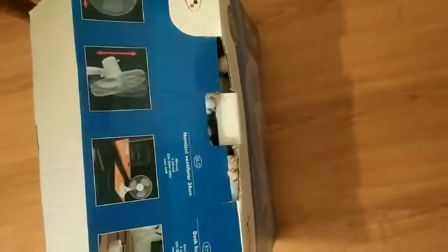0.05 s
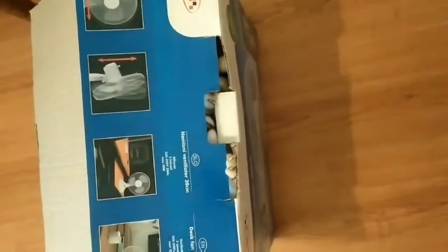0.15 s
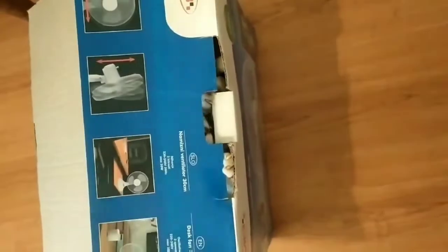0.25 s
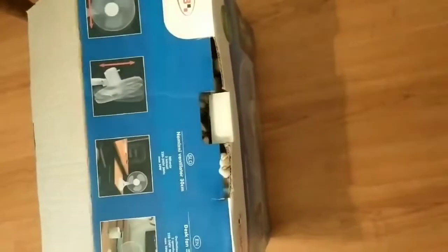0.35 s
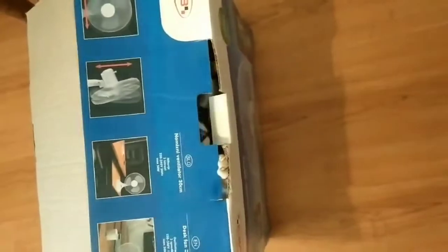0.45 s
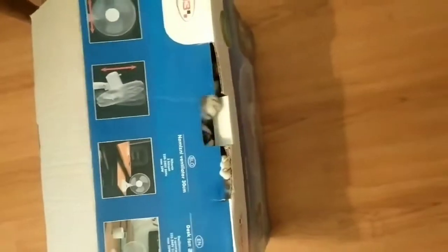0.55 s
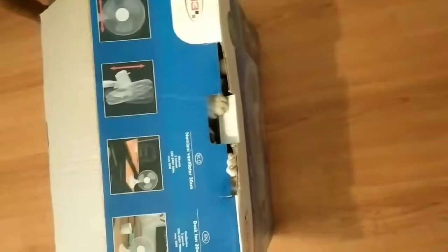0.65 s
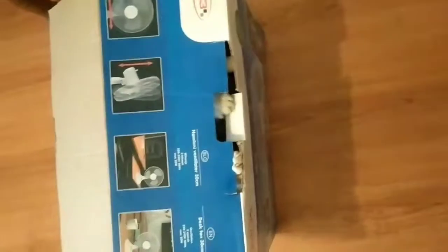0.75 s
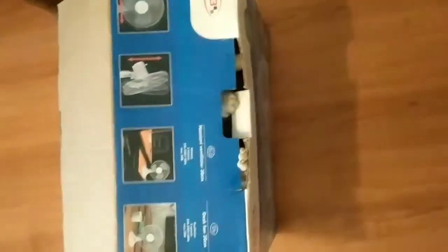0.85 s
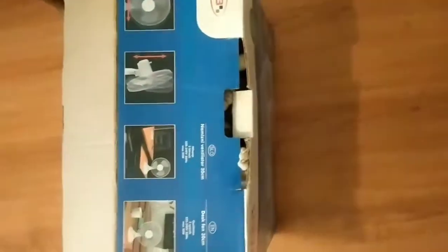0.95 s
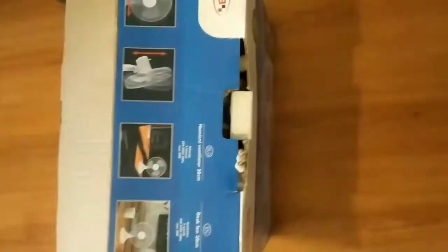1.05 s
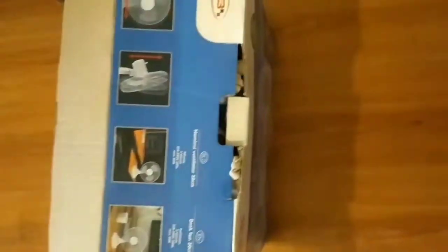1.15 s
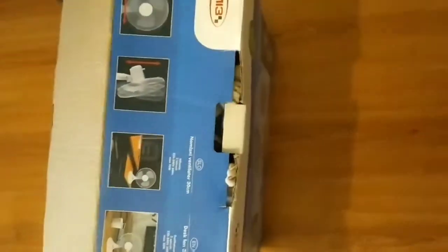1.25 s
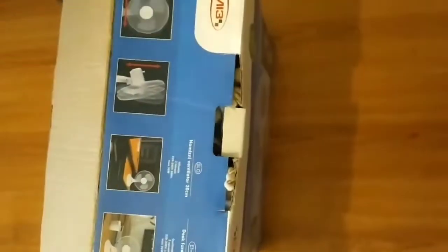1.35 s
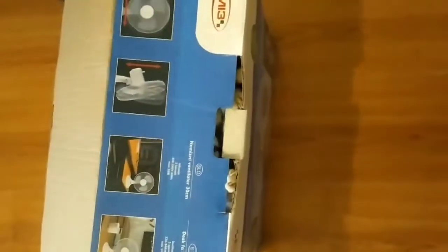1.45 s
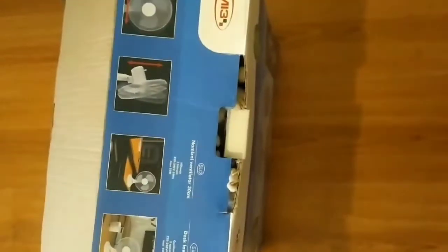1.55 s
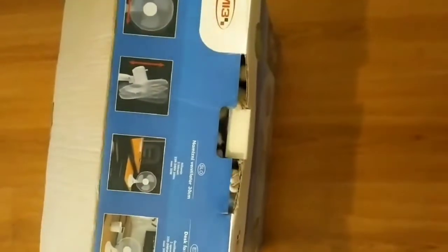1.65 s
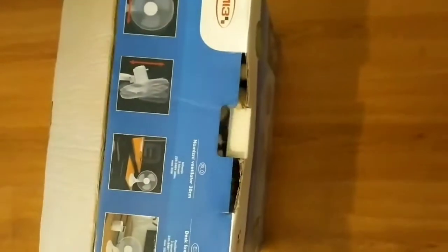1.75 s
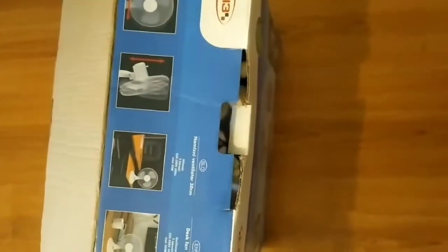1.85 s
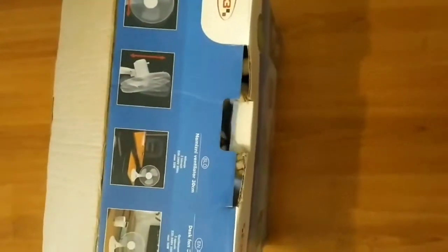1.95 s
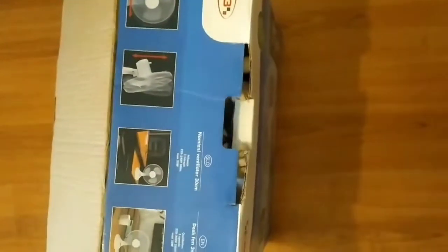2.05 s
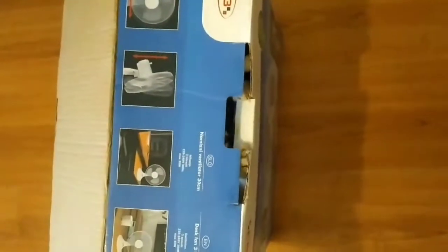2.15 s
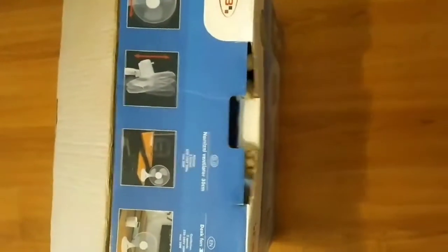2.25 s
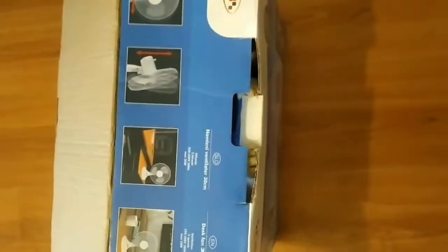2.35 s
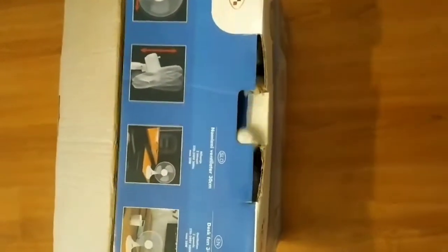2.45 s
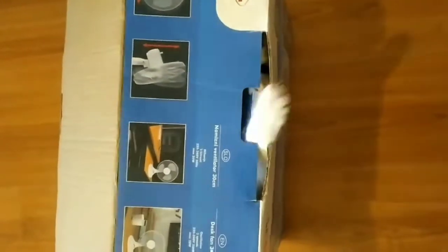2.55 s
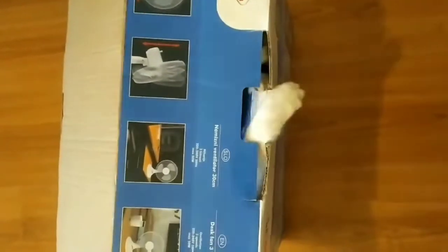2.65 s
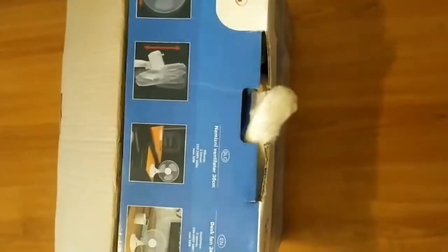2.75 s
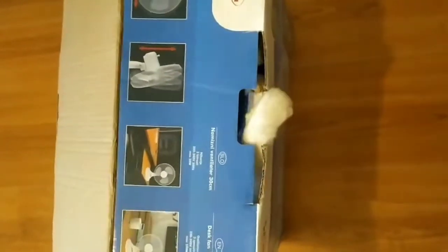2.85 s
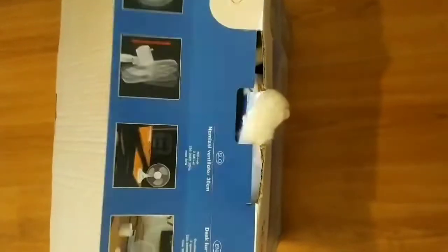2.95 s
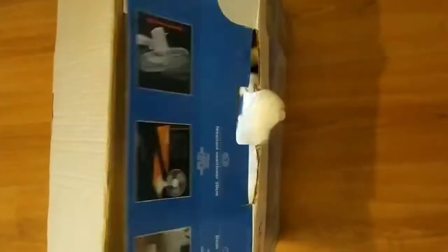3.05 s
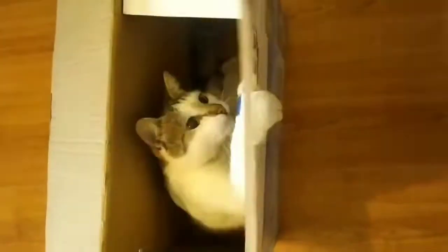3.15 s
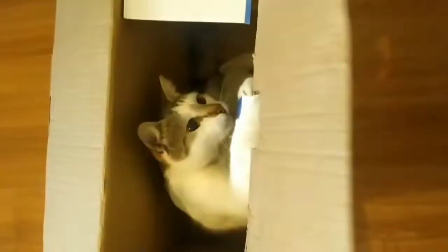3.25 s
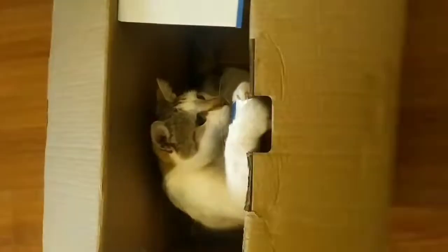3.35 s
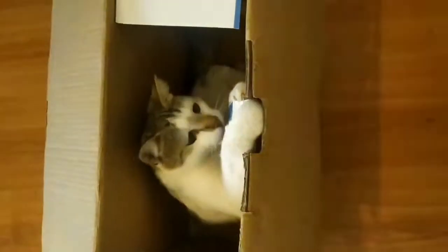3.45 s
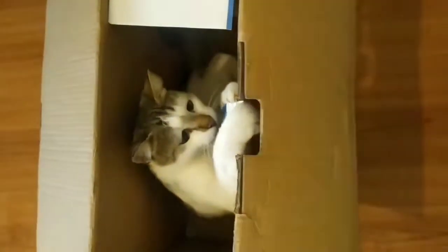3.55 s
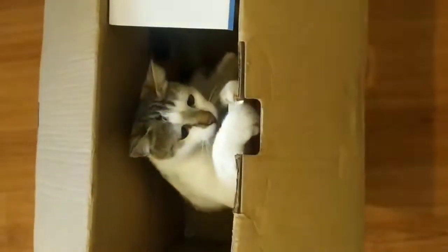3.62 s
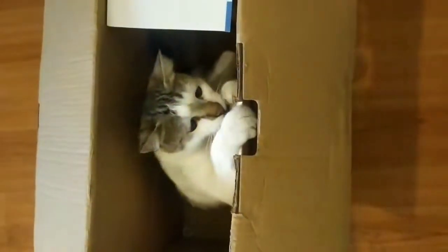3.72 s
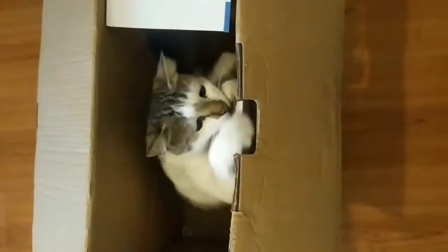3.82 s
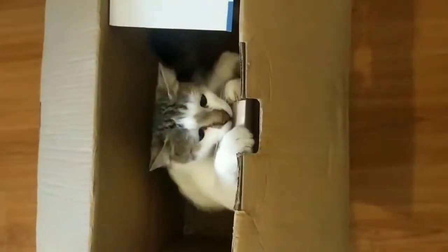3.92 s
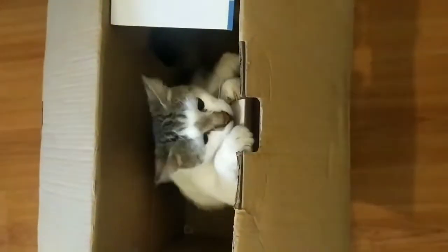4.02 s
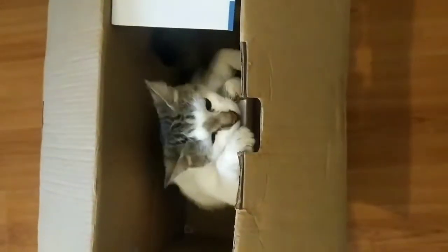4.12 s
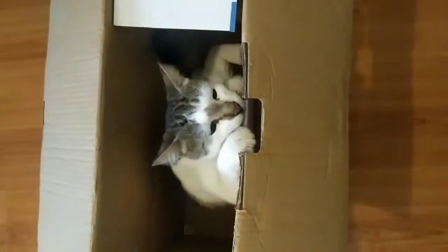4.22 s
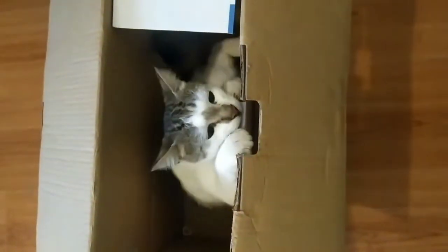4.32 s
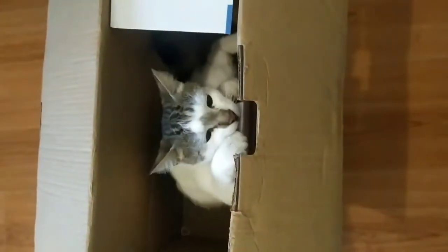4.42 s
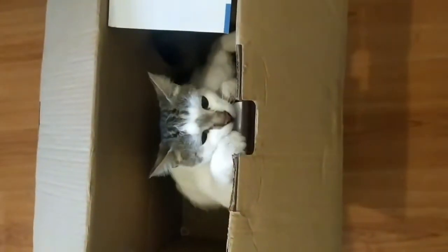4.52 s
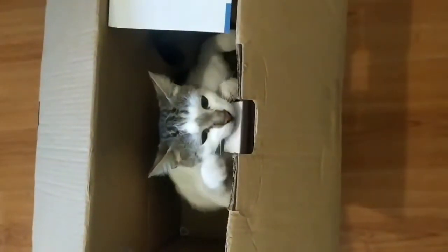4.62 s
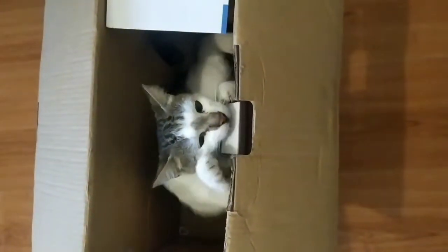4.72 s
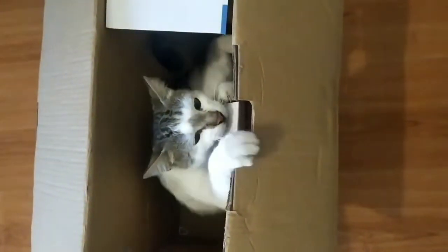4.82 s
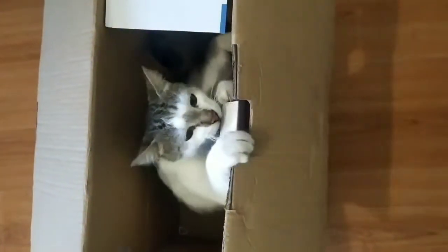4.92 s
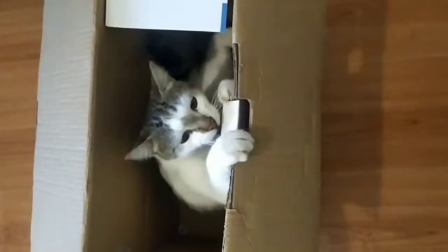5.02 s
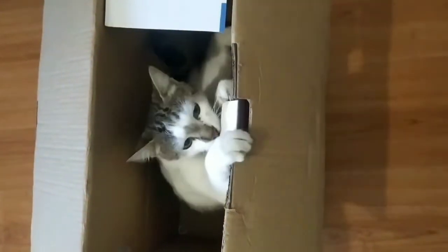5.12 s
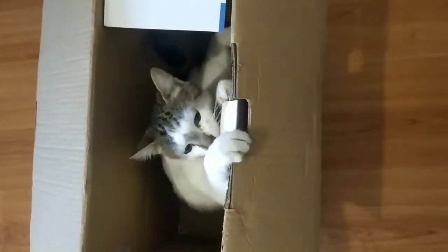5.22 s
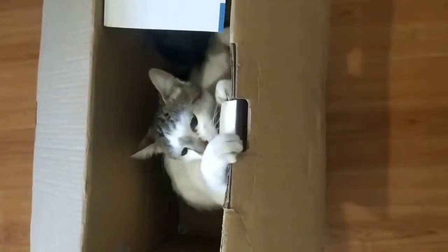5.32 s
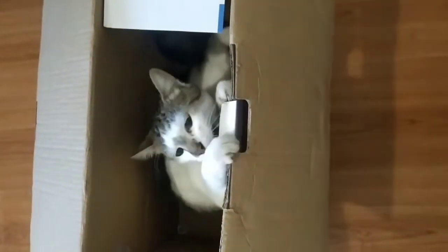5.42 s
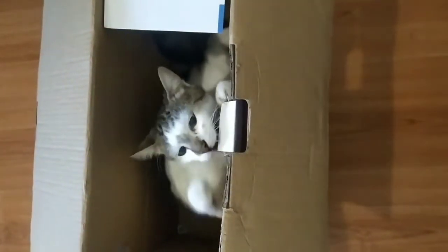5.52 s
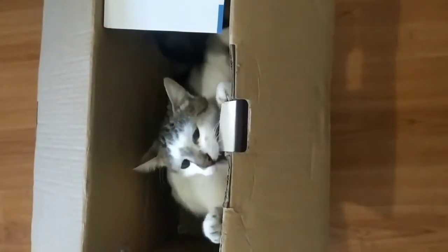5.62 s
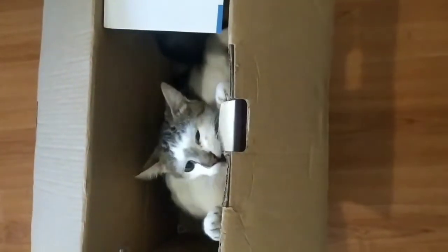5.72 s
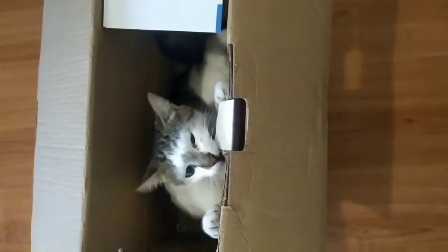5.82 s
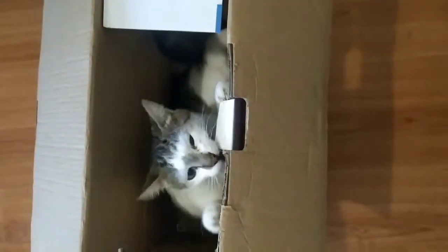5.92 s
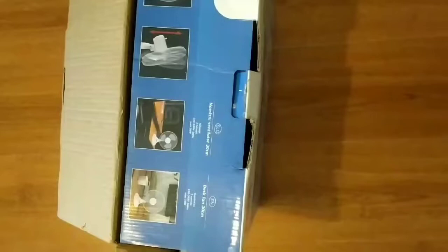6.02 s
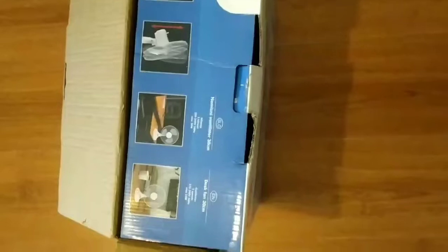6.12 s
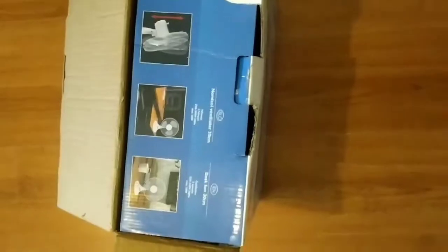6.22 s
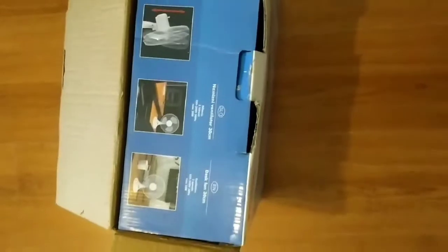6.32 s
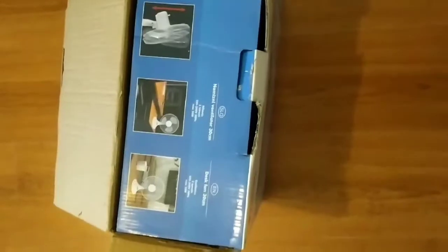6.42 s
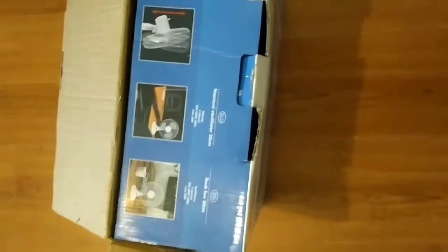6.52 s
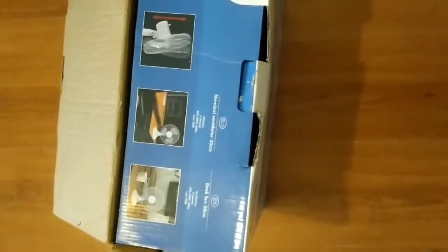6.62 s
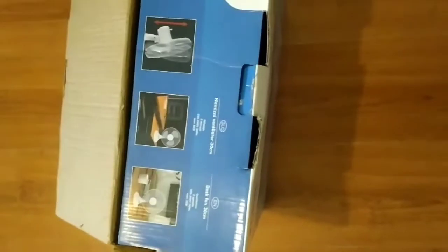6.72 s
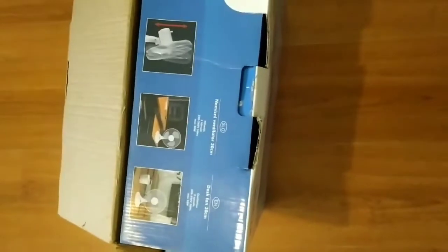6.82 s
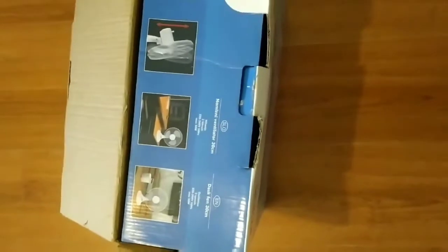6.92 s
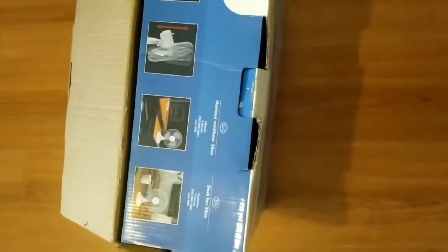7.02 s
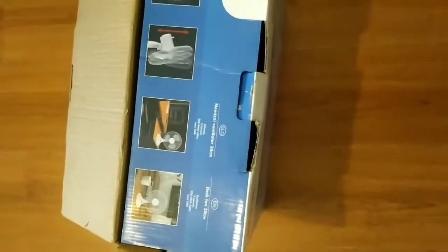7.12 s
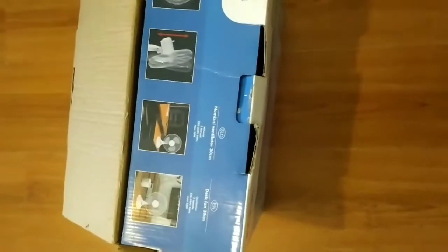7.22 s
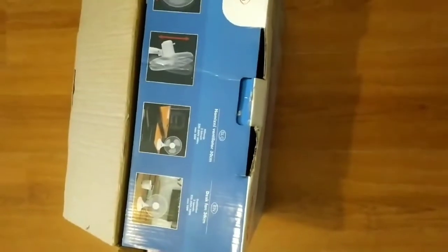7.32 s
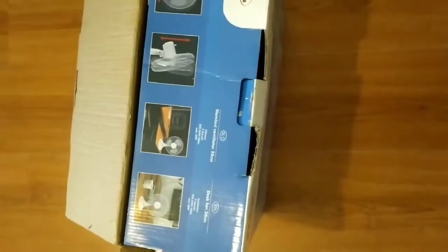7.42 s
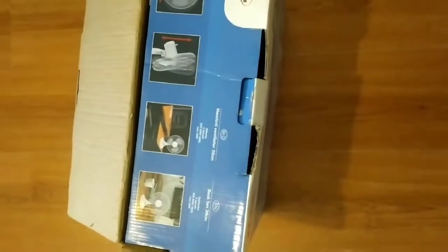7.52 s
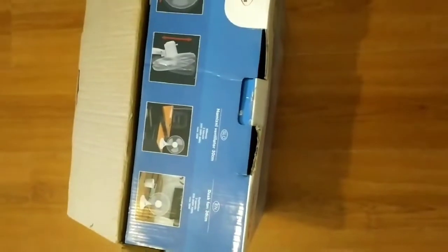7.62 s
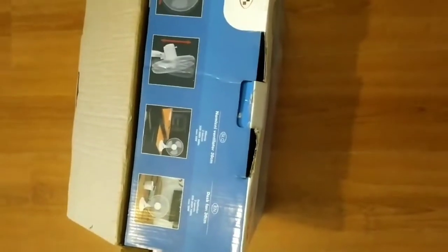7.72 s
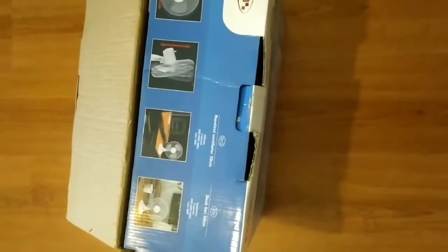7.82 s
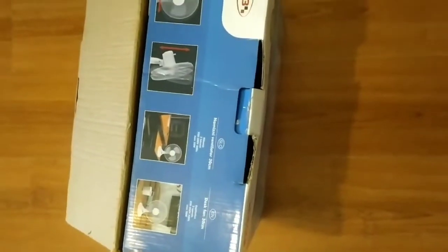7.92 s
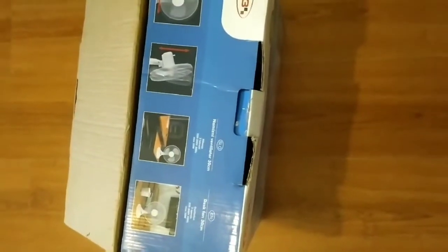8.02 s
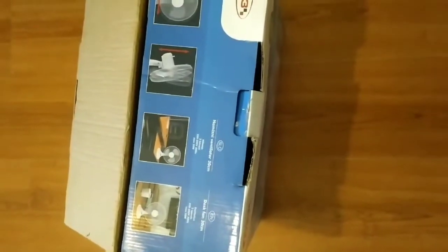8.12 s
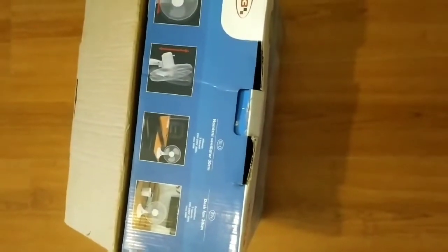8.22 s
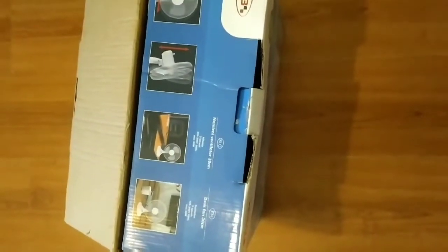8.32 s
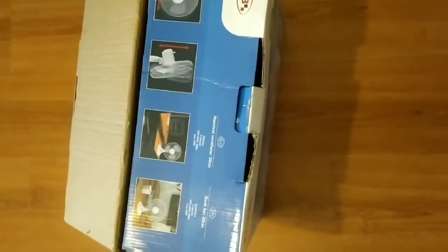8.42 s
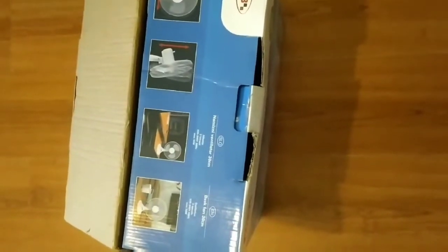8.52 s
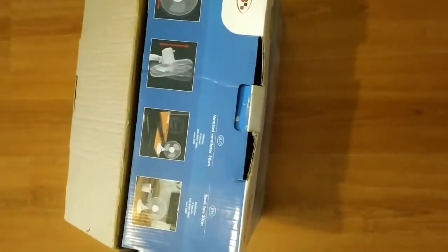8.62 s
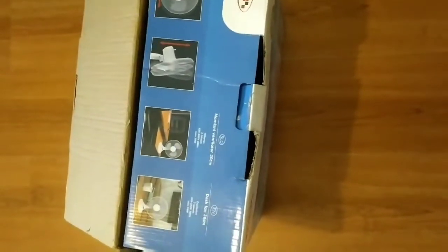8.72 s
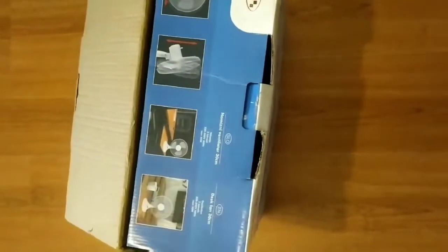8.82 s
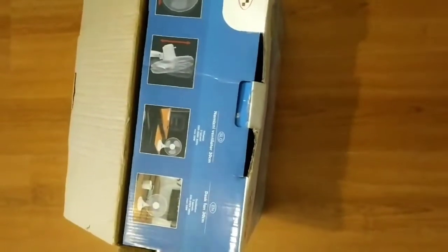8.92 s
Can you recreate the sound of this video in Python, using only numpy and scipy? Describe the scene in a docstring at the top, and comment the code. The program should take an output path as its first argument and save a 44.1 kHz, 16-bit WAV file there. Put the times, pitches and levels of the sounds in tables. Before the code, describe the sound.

A cat scrabbles inside a cardboard box, claws snapping and scraping with hollow bumps, then a lull, two firm raps and soft fur sliding.

```python
"""Cat in a cardboard box

A cat scrabbles inside a box on a wooden floor, heard from just above in a small room.
Claws (noise bursts) tick and rasp (stick-slip pulses) over card, a flap scrapes, blows ring panel modes.
After a short lull the closed lid takes two firm raps (modes and thuds), then fur slides softly (fine slips).
Soft puffs like faint sniffs (resonant noise) and one brush come late; room air and a whine lie beneath."""
import sys
import numpy as np
from scipy import signal
from scipy.fft import rfft, irfft
from scipy.io import wavfile

SR = 44100
rng = np.random.default_rng(int(sys.argv[2]) if len(sys.argv) > 2 else 0)


def store_wav(level_fs):
    """Save 16-bit WAV to argv[1]."""
    pcm = np.round(np.clip(np.atleast_2d(level_fs), -1, 1) * 32767)
    wavfile.write(sys.argv[1], SR, pcm.T.astype(np.int16))


N = 395577
TIME = np.arange(N) / SR
RING = TIME[:SR // 2]  # time axis of one short sound

# paws and body on a panel: (time [s], peak level [dB], spot pitch [Hz], nominal ring t60 [s],
# wall flex before trim [dB])
PANEL_BUMPS = [(0.002, -40, 251, 0.051, -68), (0.15, -39.5, 138, 0.12, -51), (.155, -39, 603, 0.047, -61),
               (.18, -50, 613, 0.073, -68), (0.452, -43, 590, .05, -78), (.547, -39.5, 540, 0.052, -59),
               (0.549, -40, 127, 0.13, -46), (0.621, -38, 320, .1, -43), (0.64, -31, 238, 0.13, -41),
               (0.73, -35, 500, .08, -59), (.763, -52, 697, .1, -56), (0.923, -53, 430, .1, -67),
               (1.015, -40, 136, 0.11, -70), (1.056, -36.5, 255, 0.066, -56), (1.212, -36, 372, .07, -63),
               (1.215, -41, 857, 0.1, -68), (1.281, -37, 627, 0.11, -62), (1.5009, -31, 296, .04, -57.5),
               (1.505, -39, 537, 0.11, -65), (1.72, -31, 388, 0.081, -53.5), (1.92, -38, 234, 0.11, -45),
               (1.955, -38.5, 231, 0.3, -58), (2.207, -36.5, 238, 0.24, -53),
               (2.304, -34, 199, 0.064, -42.5), (2.492, -35, 161, 0.1, -43.5), (2.585, -35, 167, 0.16, -48),
               (2.621, -44, 290, 0.21, -58), (2.662, -42, 277, 0.21, -64), (2.693, -36, 291, 0.16, -46),
               (2.696, -32.5, 829, 0.11, -69), (2.779, -33, 272.4, 0.27, -59), (3.105, -40, 336, .1, -62),
               (3.355, -31, 279, 0.12, -45.5), (3.423, -39, 698, .08, -59), (3.486, -31, 450, .06, -52),
               (3.622, -37, 348, 0.11, -62.5), (3.708, -31.5, 351, 0.14, -49),
               (3.866, -30.5, 330, 0.1, -39), (3.903, -37, 348, 0.094, -58), (4.109, -41, 790, 0.092, -52),
               (4.229, -32.5, 389, 0.096, -51), (4.456, -44, 185, .1, -56), (4.6291, -30, 460, 0.06, -43.5),
               (4.967, -34.5, 427, 0.046, -46), (5.046, -39.5, 299, 0.12, -66),
               (5.326, -36.5, 225, 0.061, -47), (5.37, -27.5, 230, 0.052, -49),
               (5.498, -36, 148.4, 0.069, -50), (7.343, -58, 151.3, .08, -75.5),
               (7.794, -46, 253.4, 0.11, -72), (8.026, -51, 372, 0.098, -71), (8.685, -47, 124, 0.12, -52),
               (8.935, -45, 130.5, 0.073, -43)]
# firm raps on the lid: (time [s], level before trims [dB], spot pitch [Hz], slap peak [dB],
# flap rebound delay [s], rebound peak [dB])
LID_RAPS = [(6.5102, -18, 156.6, -25, 0.0047, -22), (6.7164, -19, 277.3, -29, 0.0033, -24)]
# panels and enclosed air: (nominal frequency [Hz], level [dB], t60 [s])
BOX_MODES = [(78.4, -21.5, 0.3), (121.8, -0.5, 0.41), (158.7, -0.5, .14), (224.3, -5, 0.42),
             (264.5, -1, 0.19), (286.2, 0.5, 0.16), (396, -15, .12), (449.6, -7, 0.22), (512, -12, 0.11),
             (623, -23.5, 0.098), (740, -25, .12), (806, -15, 0.28)]
# woody crack of the board: (frequency [Hz], level [dB])
CRACK_COLOUR = [(150, -13), (400, 0), (800, 1.5), (1300, -5.5), (1800, -8), (2700, -10), (3800, -14),
                (8000, -20.5), (15500, -32.5)]
# bright rasp of claws on card: (frequency [Hz], level [dB])
RASP_COLOUR = [(500, -22), (2000, -13.5), (3700, -16.5), (4400, -7), (5400, -1.5), (7000, -6), (9000, 1),
               (12000, -7.5), (15500, -10)]
# coarse scrape of the board: (frequency [Hz], level [dB])
SCRAPE_COLOUR = [(100, -22), (240, -7), (370, 7), (520, -2.5), (850, -2.5), (1250, -9.5), (1700, -13),
                 (2600, -13), (3800, -23.5), (8000, -35.5), (15500, -38.5)]
# single card ticks: (frequency [Hz], level [dB])
TICK_COLOUR = [(200, -13.5), (500, -1), (1000, 0), (2400, -4.5), (3700, -8), (5400, -3.5), (8000, -4),
               (15500, -10)]


def undb(db):
    """Decibels to gain."""
    return 10 ** (np.asarray(db) / 20)


def unit(x):
    """Scale to rms 1."""
    return x / np.sqrt(np.mean(x ** 2))


def peak(x, db):
    """Scale to a peak level."""
    return x * undb(db) / np.abs(x).max()


def add(track, s, sound):
    """Mix a sound into a track at a time."""
    i = max(int(s * SR), 0)
    track[..., i:i + sound.shape[-1]] += sound[..., :N - i]


def random_signs(count):
    """Random polarities."""
    return rng.choice([-1., 1.], count)


def colour(x, tone, size=4096):
    """Causal minimum-phase filter through (Hz, dB) points, built from the cepstrum."""
    hz, db = np.transpose(tone)
    grid_hz = np.arange(size // 2 + 1) * SR / size
    gain = undb(np.interp(np.log(grid_hz + 1), np.log(hz), db))
    cepstrum = irfft(np.log(gain))
    cepstrum[1:size // 2] *= 2
    cepstrum[size // 2 + 1:] = 0
    return signal.oaconvolve(x, irfft(np.exp(rfft(cepstrum))))[:len(x)]


def vary(tone, patchy_db):
    """Each spot of the board adds random resonances to the common colour."""
    hz, db = np.transpose(tone)
    grid = np.geomspace(hz[0], hz[-1], num=30)
    common_db = np.interp(np.log(grid), np.log(hz), db)
    return np.column_stack([grid, common_db + patchy_db * rng.standard_normal(len(grid))])


def walk(rate, count=N):
    """Random wander through `rate` knots per second; rms 1."""
    knots = rng.standard_normal(count // 100)
    return unit(np.interp(TIME[:count] * rate, np.arange(len(knots)), knots))


def envelope(t, hold_s, attack_s, release_s):
    """A push that builds from t = 0, is held, and lets go; exponential time constants."""
    build = 1 - np.exp(-np.maximum(t, 0) / attack_s)
    return build * np.exp(-np.maximum(t - hold_s, 0) / release_s)


def level_curve(table, axis):
    """Gain along one dB column of a table; silent outside its times."""
    rows = np.transpose(table)
    inside = (TIME > rows[0, 0]) * (TIME < rows[0, -1])
    return undb(np.interp(TIME, rows[0], rows[axis])) * inside


def pan(x, db):
    """Place a sound by its left minus right level."""
    gains = undb(np.array([[db], [-db]]) / 2)
    return x * gains / gains.mean()


def place(x, db):
    """A spot inside the box: louder on one side, one or two samples apart at the ears."""
    lag = rng.choice([-2, -1, 1, 2, 2])
    padded = np.pad(x, 8)
    return pan(np.array([np.roll(padded, lag), padded])[:, :len(x)], db)


def burst(decay_s):
    """Fibres giving way: a rush of tiny cracks that dies exponentially."""
    return random_signs(len(RING)) * rng.uniform(0.4, 1, len(RING)) * np.exp(-RING / decay_s)


def slips(rate, spread_db, tone, grip_db, grip_rate, count=N):
    """Stick-slip friction: uneven pulses, `rate` per second, bunched by a wandering grip; rms 1."""
    sizes = undb(spread_db * np.minimum(rng.exponential(size=count), 4))
    pulses = (rng.random(count) < rate / SR) * sizes * random_signs(count)
    return unit(colour(pulses * undb(grip_db * walk(grip_rate, count)), tone))


def dragged(length, rate, spread_db, tone, grip_db, grip_rate, count, patchy_db=4.0):
    """Friction travelling over the board: one spot's resonances crossfade into the next's."""
    first, last = (slips(rate, spread_db, vary(tone, patchy_db), grip_db, grip_rate, count)
                   for _ in range(2))
    turn = np.pi / 2 * np.minimum(TIME[:count] / length, 1)
    return first * np.cos(turn) + last * np.sin(turn)


def crackle(rate, tone, count, spot_count=3):
    """Single ticks from a few spots of card that each ring and lie differently; stereo, rms 1."""
    spots = [slips(rate / spot_count, 2.5, vary(tone, patchy_db=4.5), grip_db=2, grip_rate=40, count=count)
             for _ in range(spot_count)]
    return unit(sum(place(spot, 4.5 + 2.5 * rng.standard_normal()) for spot in spots))


def nearness(hz, reach_octaves):
    """A blow wakes most the box modes near the struck spot's pitch."""
    octaves = np.log2(np.array(BOX_MODES)[:, 0] / hz)
    return 1 / (1 + (octaves / reach_octaves) ** 2)


def box_ring(weights, detune):
    """The box's decaying modes after one blow; the cat's weight shifts them a little."""
    hz, db, t60 = np.transpose(BOX_MODES)[:, :, None]
    hz = hz * (1 + detune * rng.standard_normal(hz.shape))
    return weights @ (undb(db - 60 * RING / t60) * np.sin(2 * np.pi * hz * RING))


def spot_ring(hz, t60):
    """A struck spot of panel bends in a few modes, spaced differently each time; peak 1."""
    # bending modes: (nominal multiple of pitch, level [dB], share of ring t60)
    spot_modes = [(1, 4.5, 0.89), (1.45, -5.5, 0.84), (2.1, -12.5, 0.33), (2.9, -11.5, 0.78)]
    multiple, db, share = np.transpose(spot_modes)[:, :, None]
    partials_hz = hz * multiple ** rng.uniform(0.88, 1.2)
    modes = np.sin(2 * np.pi * partials_hz * RING) * undb(db - 60 * RING / (t60 * share))
    return peak(random_signs(len(spot_modes)) @ modes, 0)


def diffuse(count, apart_hz):
    """Stereo noise from all sides: alike in the bass, unrelated in the treble."""
    mid, side = rfft(rng.standard_normal((2, count)))
    hz = np.linspace(0, SR / 2, len(mid))
    angle = np.pi / 4 * hz / np.hypot(hz, apart_hz)
    return irfft(mid * np.cos(angle) + np.array([[1], [-1]]) * side * np.sin(angle), count)


def room(x, wet_db, first_s=0.0022):
    """Dense reflections from box, floor and walls: noise bands, each with its own decay."""
    # room ring: (band centre [Hz], t60 [s], reflected level before wet_db [dB])
    room_bands = [(60, 0.29, -1), (166.3, 0.25, -9), (415.3, 0.31, -0.5), (1150, 0.22, 1), (2970, 0.25, 4),
                  (7300, 0.16, 1.5), (14920, 0.17, 2.5)]
    centres = np.log(np.array(room_bands)[:, 0])
    noise = rfft(diffuse(len(RING), apart_hz=300.3))
    log_hz = np.log(np.linspace(1, SR / 2, noise.shape[1]))
    response = 0
    for share, (hz, t60, db) in zip(np.eye(len(room_bands)), room_bands):
        fade = undb(-60 * RING / t60) * (RING > first_s)
        band = irfft(noise * np.interp(log_hz, centres, share), len(RING))
        response = response + band * undb(db + wet_db) * fade / np.linalg.norm(fade)
    return x + signal.oaconvolve(x, response, axes=1)[:, :N]


def quiet(air_db=-70.5, whine_hz=682, whine_db=-83):
    """Still room air as coloured diffuse noise, with a faint phase-wandering sine whine."""
    # room air: (frequency [Hz], level [dB])
    air_colour = [(18, -32), (35, -9), (70, 0), (130, -9), (300, -15), (600, -19), (1200, -24), (3000, -21),
                  (5000, -23), (9000, -22), (15500, -27)]
    air = unit(np.array([colour(ear, air_colour) for ear in diffuse(N, apart_hz=495.5)]))
    whine = np.sin(2 * np.pi * whine_hz * TIME + 1.6 * walk(16))
    return undb(air_db) * air + undb(whine_db) * whine


def wall_load(attack_s=0.026, hold_s=0.041, release_s=0.046, sway_lag_s=0.02, sway_db=-39.5):
    """Weight bending the walls: follows every bump and rap, and comes alone when the cat leans."""
    # leaning without a blow: (time [s], hold [s], level before trim [dB])
    lean_pushes = [(.85, 0.1, -52), (3.08, 0.2, -66), (3.56, 0.2, -53), (4.85, 0.072, -44.5),
                   (5.72, 0.036, -50.5), (6.24, 0.026, -66), (7.32, 0.033, -65.5), (7.56, 0.034, -56),
                   (8.07, 0.13, -65)]
    pushes = [(s, hold_s, db) for s, *_, db in PANEL_BUMPS] + list(lean_pushes)
    pushes += [(s + sway_lag_s, hold_s, sway_db) for s, *_ in LID_RAPS]
    power = np.zeros(N)
    for s, length, db in pushes:
        add(power, s, (undb(db) * envelope(RING, length, attack_s, release_s)) ** 2)
    return np.sqrt(power)


def shifting(settles_s=5.93, rustle_db=-71.5, rumble_db=-65, creak_db=1, tick_db=-4, flex_trim_db=-3.0,
             apart_db=-11):
    """The restless cat: card rustles, creaks and ticks until it settles; walls rumble as they flex."""
    # wall rumble: (frequency [Hz], level [dB])
    flex_colour = [(20, -29.5), (30, -14.5), (48, 1), (75, 3.5), (98, -6.5), (120, 3.5), (190, -16),
                   (270, -6), (500, -26), (1500, -45.5)]
    restless = envelope(TIME, settles_s, attack_s=0.0035, release_s=0.02)
    rustle = slips(rate=1900, spread_db=1.0, tone=RASP_COLOUR, grip_db=1.5, grip_rate=24)
    creak = slips(rate=310, spread_db=-0.5, tone=SCRAPE_COLOUR, grip_db=1.0, grip_rate=32)
    ticks = crackle(rate=25, tone=TICK_COLOUR, count=N)
    card = pan(rustle + undb(creak_db) * creak, db=3.5) + undb(tick_db) * ticks
    flex, twist = (slips(rate=210, spread_db=-1.0, tone=flex_colour, grip_db=2.0, grip_rate=28)
                   for _ in range(2))
    walls = flex + np.array([[1], [-1]]) * twist * undb(apart_db)
    load = np.hypot(wall_load() * undb(flex_trim_db), restless * undb(rumble_db))
    return card * restless * undb(rustle_db) + walls * load


def thumps(contact_s=0.0025, sag=0.21, sag_s=0.011):
    """The bottom of the box meets the floor: a low sine starting sharp and falling as the board relaxes."""
    # cat's weight dropping: (time [s], peak level [dB], settled pitch [Hz], t60 [s])
    floor_drops = [(.621, -36, 120, 0.12), (2.323, -41.5, 115, 0.16), (3.484, -41, 95, 0.053),
                   (3.899, -37.5, 61.7, 0.12), (4.225, -40.5, 111, .09), (5.327, -46, 127, 0.091),
                   (5.375, -38.5, 126, 0.14), (5.881, -46.5, 78.4, 0.097), (8.945, -46, 114, .14)]
    out = np.zeros(N)
    for s, db, hz, t60 in floor_drops:
        cycles = np.cumsum(hz * (1 + sag * np.exp(-RING / sag_s))) / SR
        swell = 1 - np.exp(-RING / contact_s)
        add(out, s, peak(np.sin(2 * np.pi * cycles) * swell * undb(-60 * RING / t60), db))
    return pan(out, db=3.0)


def puffs(resonance_db=-5):
    """Short soft puffs, like faint sniffs or breaths, and one brush: treble noise plus a resonance."""
    # puffs and brush: (time [s], hold [s], level [dB], resonance pitch [Hz], relative treble [dB])
    puff_events = [(6.058, 0.013, -66, 2900, -15.5), (7.046, .015, -65, 3300, -20),
                   (7.063, 0.015, -60.5, 3400, -18), (8.011, .03, -63, 2830, -24),
                   (8.064, 0.042, -52, 2880, -22), (8.778, 0.026, -53.5, 3800, 3)]
    # puff treble: (frequency [Hz], level [dB])
    treble_colour = [(1000, -37), (2400, -9), (5500, -13), (7500, 10), (9500, 9.5), (12000, -12),
                     (15500, -22)]
    # puff resonance: (multiple of pitch, level [dB])
    resonance_colour = [(.25, -10.5), (.6, -10.5), (.88, -7), (1, 1.5), (1.13, -9.5), (1.5, -14),
                        (4.001, -28)]
    out = np.zeros(N)
    for s, length, db, hz, treble_db in puff_events:
        treble, resonance = (slips(6000, 2.5, tone, grip_db=1.5, grip_rate=150, count=len(RING))
                             for tone in (treble_colour, np.array(resonance_colour) * [hz, 1]))
        push = envelope(RING, length, attack_s=0.0051, release_s=0.015) * undb(db)
        add(out, s, push * (treble * undb(treble_db) + resonance * undb(resonance_db)))
    return pan(out, db=2.0)


def fur():
    """Fur on card: slips so fine they merge into hiss, over a low rub."""
    # fur along the closed box: (time [s], fine hiss [dB], low rub [dB])
    slide_levels = [(7.76, -79, -90), (7.88, -72.5, -72), (7.96, -70.5, -69), (8.1, -67, -64),
                    (8.19, -66, -66), (8.25, -87, -73), (8.35, -65, -63.5), (8.42, -70.5, -68),
                    (8.55, -63.5, -69.5), (8.63, -62.5, -63), (8.74, -59, -79), (8.82, -60.5, -74),
                    (8.87, -68.5, -77), (8.96, -68, -71)]
    # fine hiss: (frequency [Hz], level [dB])
    hiss_colour = [(500, -14), (1500, -9.5), (2800, -1.5), (5500, -5.5), (10500, 2), (15500, -8.5)]
    # low rub: (frequency [Hz], level [dB])
    rub_colour = [(100, -5.5), (350, -0.5), (600, -8.5), (1500, -14), (6000, -36.5)]
    hiss = slips(rate=12000, spread_db=4.0, tone=hiss_colour, grip_db=1.5, grip_rate=30)
    rub = slips(rate=810, spread_db=0.0, tone=rub_colour, grip_db=2.5, grip_rate=27)
    return pan(hiss * level_curve(slide_levels, axis=1) + rub * level_curve(slide_levels, axis=2), db=2.0)


def flap():
    """Card slides on card out of its slot: a bright slip rasp that swells until the flap comes free."""
    # sliding flap: (time [s], level [dB])
    flap_levels = [(3.095, -51), (3.115, -43.5), (3.17, -38), (3.195, -44), (3.215, -75), (3.255, -55.5),
                   (3.29, -44), (3.33, -43), (3.357, -30), (3.368, -43), (3.398, -45), (3.415, -59)]
    # flap rasp: (frequency [Hz], level [dB])
    flap_colour = [(500, -17), (2000, -16), (3800, -17), (4400, -11), (5300, -3), (7000, -7), (8800, -4),
                   (12000, -7.5), (15500, -15)]
    rasp = slips(rate=6000, spread_db=2.5, tone=flap_colour, grip_db=3.0, grip_rate=120)
    return place(rasp * level_curve(flap_levels, axis=1), db=3.5)


def strokes(rasp_trim_db=-1, scrape_trim_db=-1, rib_trim_db=-2.5, tick_trim_db=-3, ease_db=-4,
            bite_s=0.0031, release_s=0.0051):
    """Each drag bites, eases off and lets go: claws rasp and tick, board scrapes, ribs knock unevenly."""
    # claws, paws and flap over card: (time [s], length [s], bright rasp before trim [dB],
    # coarse scrape before trim [dB])
    drags = [(0, 0.07, -54.5, -68), (0.441, 0.17, -57, -60.5), (0.616, 0.057, -54.5, -49),
             (0.719, 0.093, -51, -55), (0.887, 0.089, -74, -61.5), (1.059, 0.038, -50.5, -57),
             (1.117, 0.032, -59, -58.5), (1.197, 0.077, -55.5, -55), (1.27, 0.04, -52, -48),
             (1.322, 0.17, -59.5, -61.5), (1.51, 0.077, -58, -60.5), (1.669, 0.11, -55, -57),
             (1.729, 0.048, -45.5, -73), (1.881, 0.11, -62, -54), (1.947, 0.022, -44.5, -53.5),
             (2.186, 0.019, -65, -56), (2.284, 0.079, -55.5, -61.5), (2.429, 0.092, -62.5, -63.5),
             (2.505, 0.17, -48, -65.5), (2.685, 0.017, -47, -45), (2.721, 0.15, -55, -72),
             (3.032, 0.038, -49, -57.5), (3.11, 0.095, -57, -56), (3.327, 0.045, -45.5, -46.5),
             (3.415, 0.032, -56, -44), (3.489, 0.092, -58.5, -51.5), (3.558, 0.054, -55, -44.5),
             (3.622, 0.055, -62, -45.5), (3.664, 0.069, -51.5, -45), (3.862, 0.059, -47.5, -45.5),
             (4.107, 0.068, -53.5, -46), (4.227, 0.045, -51.5, -48.5), (4.318, 0.094, -65, -56.5),
             (4.439, 0.061, -97, -63), (4.628, 0.017, -40, -50.5), (4.711, 0.039, -55, -55),
             (4.81, 0.066, -52.5, -55.5), (4.876, 0.076, -53, -49), (4.978, 0.096, -64, -52.5),
             (5.176, 0.048, -74, -61.5), (5.321, 0.014, -42.5, -47.5), (5.374, 0.027, -52, -54),
             (5.476, 0.042, -52.5, -54), (5.64, 0.056, -57.5, -57.5), (5.726, 0.049, -65, -64),
             (5.9, 0.018, -52.5, -56)]
    out, t = np.zeros((2, N)), TIME[:SR // 3]
    for s, length, bright_db, coarse_db in drags:
        pressure = envelope(t, length, bite_s, release_s) * undb(ease_db * np.minimum(t / length, 1))
        rasp = dragged(length, rate=5000, spread_db=1.0, tone=RASP_COLOUR, grip_db=1.5, grip_rate=140.0,
                       count=len(t))
        scrape = dragged(length, rate=900, spread_db=2.0, tone=SCRAPE_COLOUR, grip_db=3.5, grip_rate=90,
                         count=len(t))
        ribs, ticks = (crackle(rate=100, tone=tone, count=len(t)) for tone in (SCRAPE_COLOUR, TICK_COLOUR))
        drag = rasp * undb(bright_db + rasp_trim_db) + scrape * undb(coarse_db + scrape_trim_db)
        knocks = ribs * undb(coarse_db + rib_trim_db)
        knocks = knocks + ticks * undb((bright_db + coarse_db) / 2 + tick_trim_db)
        add(out, s, pressure * (place(drag, db=4.5) + knocks))
    return out


def bumps(box_db=-6, crunch_db=-7, reach_octaves=0.99, hard_db=-33, softening=0.65):
    """A soft blow bends one spot of a panel and wakes the box's modes near that pitch."""
    out = np.zeros(N)
    for s, db, hz, t60, _ in PANEL_BUMPS:
        weights = nearness(hz, reach_octaves) * random_signs(len(BOX_MODES))
        ring = peak(box_ring(weights, detune=.05), box_db)
        # blows softer than hard_db crush the corrugation less
        crunch = peak(colour(burst(decay_s=0.0075), CRACK_COLOUR),
                      crunch_db + softening * min(db - hard_db, 0))
        add(out, s, peak(spot_ring(hz, t60) + ring + crunch, db))
    return pan(out, db=2.5)


def raps(thud_db=-3, contact_s=0.0014, settle_s=0.0077, settle_db=-5, rattle_db=-27, spot_db=-2,
         spot_t60=0.073, box_db=-4.5):
    """Lid and box modes ring over a noise thud; box thumps floor, loose flap slaps, rebounds, rattles."""
    # dull thud: (frequency [Hz], level [dB])
    thud_colour = [(25, -51), (60, -28.5), (130, 3.5), (320, 5), (520, -9), (900, -19.5), (2000, -35.5),
                   (6000, -69.5)]
    # flap slap: (frequency [Hz], level [dB])
    slap_colour = [(200, -1), (500, 4), (1100, -2), (2600, -5.5), (4300, -10.5), (7000, -5), (11000, -10),
                   (15500, -24.5)]
    out = np.zeros(N)
    give = 1 - np.exp(-RING / contact_s)
    for s, db, hz, slap_db, rebound_s, rebound_db in LID_RAPS:
        weights = nearness(hz, reach_octaves=1.8) * random_signs(len(BOX_MODES))
        ring = box_ring(weights, detune=0.0087)
        add(out, s, peak(ring * give, db + box_db))
        add(out, s, peak(spot_ring(hz, spot_t60) * give, db + spot_db))
        add(out, s, peak(colour(burst(decay_s=0.013), thud_colour) * give, db + thud_db))
        add(out, s + settle_s, peak(colour(burst(decay_s=0.0058), thud_colour), db + settle_db))
        add(out, s, peak(colour(burst(decay_s=0.0035), slap_colour), slap_db))
        add(out, s + rebound_s, peak(colour(burst(decay_s=0.0015), slap_colour), rebound_db))
        add(out, s, peak(colour(burst(decay_s=0.037), CRACK_COLOUR), db + rattle_db))
    return pan(out, db=2.0)


def handle_ring(detune=0.023, uneven_db=7.0):
    """The plastic handle's short decaying modes, a little different wherever it is caught."""
    # carrying handle: (nominal frequency [Hz], nominal level [dB], t60 [s])
    handle_modes = [(5280, -1, 0.012), (6080, -2.5, 0.014), (7600, -5, .012), (8520, -3.5, 0.016),
                    (10120, -7.5, .012)]
    hz, db, t60 = np.transpose(handle_modes)[:, :, None]
    shift, strength = rng.standard_normal((2, len(handle_modes), 1))
    decay = undb(db + uneven_db * strength - 60 * RING / t60)
    return (decay * np.sin(2 * np.pi * hz * (1 + detune * shift) * RING)).sum(axis=0)


def claws(snap_trim_db=2, crack_trim_db=2, handle_db=-8, second_db=-10, second_s=0.0016, side_db=6.5,
          side_spread_db=0.5):
    """A claw snaps off the card and catches again at once; handle rings, board cracks under it."""
    # claws catching and letting go: (time [s], snap level before trim [dB],
    # woody crack relative to snap level, before trim [dB])
    catches = [(0.1528, -40, -9), (0.176, -35, -10), (0.2525, -35.5, -16.5), (0.41, -50, -7),
               (0.46, -41, -8), (0.5439, -48, 5), (0.565, -28.5, -10), (0.6208, -28, -4.5),
               (.629, -34.5, 3), (0.6419, -26, -16), (0.7316, -48.5, 13), (0.7626, -32.5, 0.5),
               (0.894, -45, -7), (.932, -54, 7), (.9572, -48, -3.5), (1.0128, -47, 3), (1.057, -42.5, -13),
               (1.1382, -43.5, -4), (1.212, -42, -15), (1.2822, -35.5, -2), (1.502, -40.5, -22.5),
               (1.64, -42, -4.5), (1.718, -28, -18), (1.7199, -7.5, -22.5), (1.9348, -45.5, 6),
               (2.1077, -43, -12), (2.1792, -43, -17), (2.2009, -45, 1), (2.3043, -44.5, 7),
               (2.3245, -35.5, -28), (2.4318, -44, -11), (2.504, -31.5, -10.5), (2.6612, -31, -14),
               (2.6915, -22.5, -10), (2.6952, -18, -8.5), (2.7785, -32, -8), (3.035, -42, -4),
               (3.0667, -33, -25), (3.0875, -30, -28), (3.1, -37, -12), (3.3585, -12.5, -21),
               (3.425, -46, 4), (3.4873, -34.5, -3.5), (3.5602, -45, 2), (3.684, -42, 3), (3.736, -43, 0),
               (3.6208, -39.5, 3), (3.711, -40, 4), (3.851, -42, 1), (3.8667, -22, -8.5), (3.8684, -20, -9),
               (4.0714, -45, -6.5), (4.113, -35, 1), (4.154, -38, 0), (4.226, -36, -8), (4.3217, -55, 5),
               (4.4578, -50, -0.5), (4.6298, -35.5, 0), (4.6362, -31.5, -9.5), (4.724, -43, -22),
               (4.815, -37.5, 1.5), (4.893, -38, -3), (4.966, -34.5, 5), (5.0677, -48.5, 8.5),
               (5.1308, -52, -17), (5.2196, -47, -19), (5.3245, -24, -28), (5.3397, -28.5, -19),
               (5.3708, -21.5, -7), (5.4979, -34, -7), (5.8795, -51, 10), (7.228, -57, -8),
               (7.344, -64.5, -2), (7.5767, -63, 5), (8.778, -32.5, -23)]
    # bright snap: (frequency [Hz], level [dB])
    snap_colour = [(500, -33), (2000, -16), (3700, -19), (4500, -8.5), (5300, 1), (7000, -5.5),
                   (8800, -2.5), (12000, -9.5), (15500, -11)]
    out = np.zeros((2, N))
    for s, db, woody_db in catches:
        second = np.roll(burst(decay_s=0.0021), int(second_s * SR))
        force = burst(decay_s=0.00065) + undb(second_db) * second
        snap = peak(colour(force, snap_colour), db + snap_trim_db)
        handle = peak(handle_ring(), db + handle_db)
        crack = colour(burst(decay_s=0.0037), vary(CRACK_COLOUR, patchy_db=4.0))
        crack = peak(crack, db + woody_db + crack_trim_db)
        add(out, s, place(snap + handle + crack, side_db + side_spread_db * rng.standard_normal()))
    return out


def scene():
    """All sources in the room; the claws are driest, then lid raps and thumps."""
    soft = room(strokes() + flap() + shifting() + fur() + puffs(), wet_db=0.0)
    blows = room(bumps(), wet_db=-4.0) + room(raps() + thumps(), wet_db=-5.0)
    return quiet() + soft + blows + room(claws(), wet_db=-9.5)


def record(dry, low_hz=32, top_hz=15800, dip_at_s=5.93, dip_hold_s=0.061, dip_db=-41.5, dip_return_s=0.039):
    """Each microphone has its colour and loses deep bass; all sound dips briefly; the top is cut."""
    # microphone colours: (frequency [Hz], left minus right [dB])
    ear_colour = [(120, 0), (300, 0), (1000, -2), (2200, 1.5), (4800, 4), (8000, 0), (12500, -1)]
    ears = np.array([colour(ear, np.array(ear_colour) * [1, side / 2]) for ear, side in zip(dry, (1, -1))])
    heard = signal.sosfilt(signal.butter(3, low_hz, "high", fs=SR, output="sos"), ears)
    dip = undb(dip_db * envelope(TIME - dip_at_s, dip_hold_s, attack_s=0.0024, release_s=dip_return_s))
    return signal.sosfilt(signal.ellip(10, .2, 70, top_hz, fs=SR, output="sos"), heard * dip)


dry = scene()
out = record(dry)
store_wav(out)
```